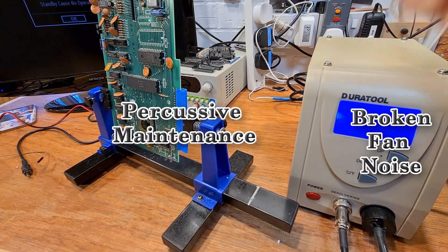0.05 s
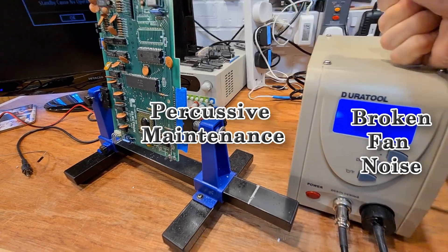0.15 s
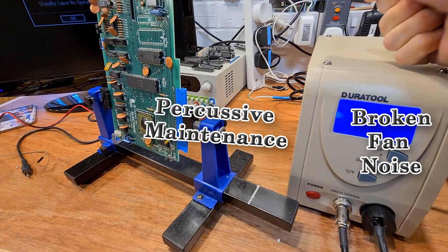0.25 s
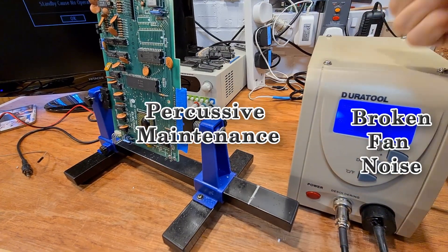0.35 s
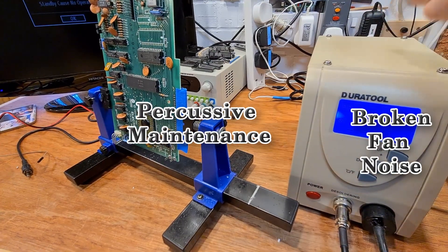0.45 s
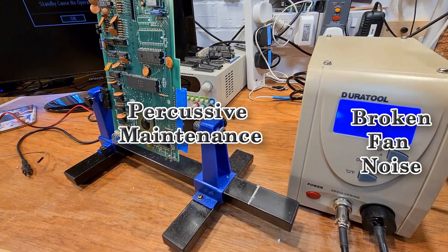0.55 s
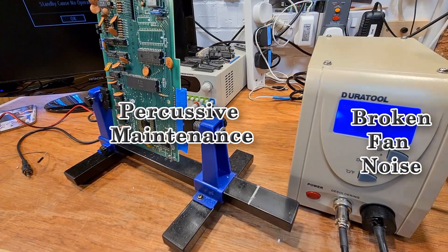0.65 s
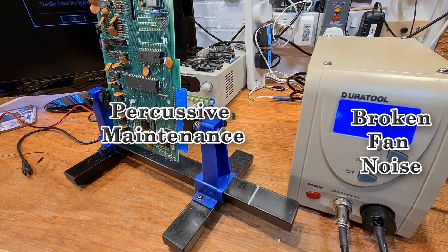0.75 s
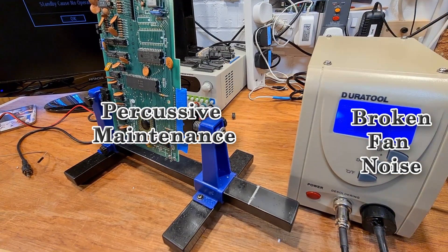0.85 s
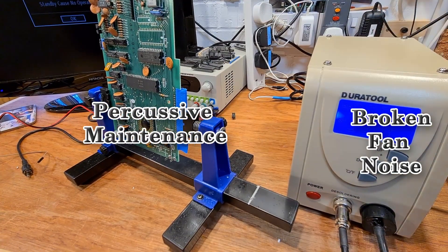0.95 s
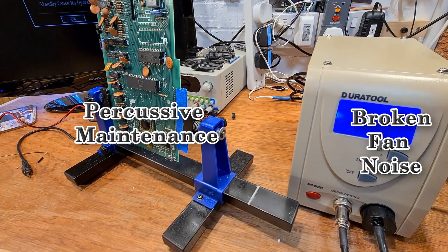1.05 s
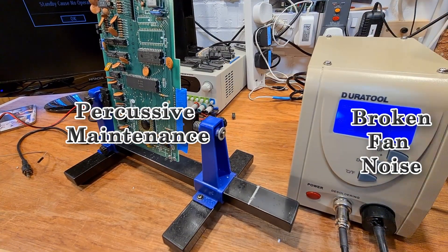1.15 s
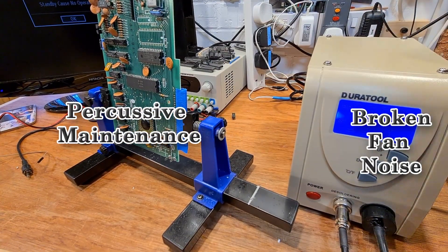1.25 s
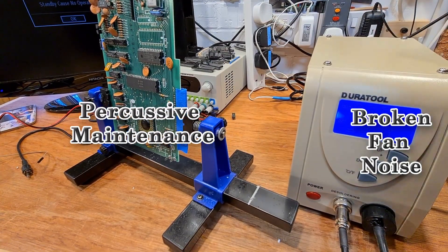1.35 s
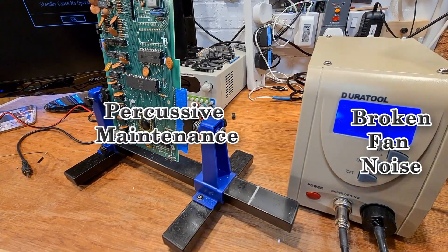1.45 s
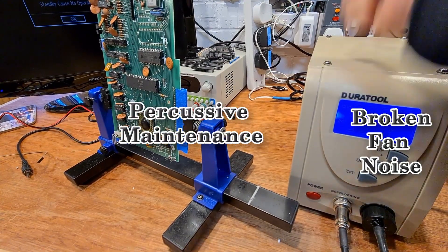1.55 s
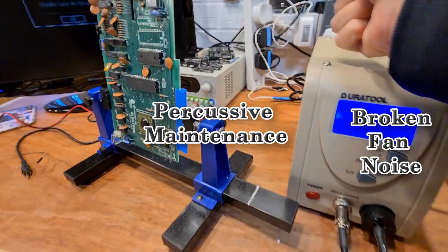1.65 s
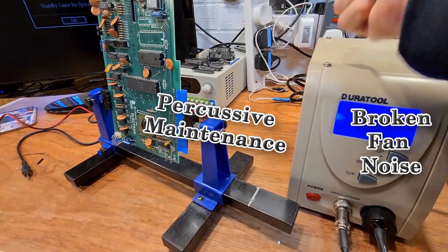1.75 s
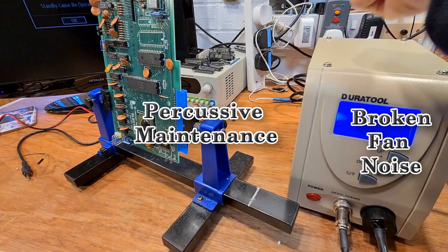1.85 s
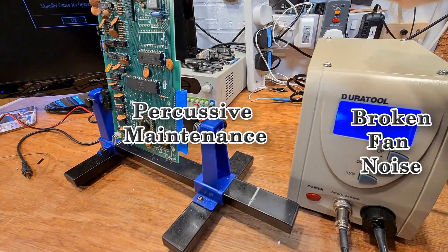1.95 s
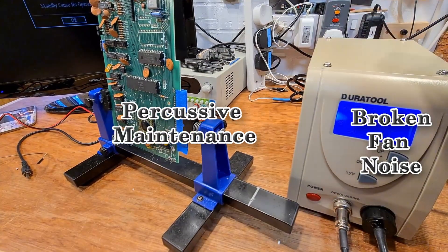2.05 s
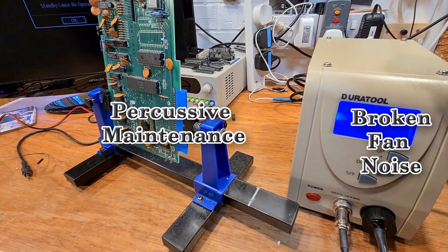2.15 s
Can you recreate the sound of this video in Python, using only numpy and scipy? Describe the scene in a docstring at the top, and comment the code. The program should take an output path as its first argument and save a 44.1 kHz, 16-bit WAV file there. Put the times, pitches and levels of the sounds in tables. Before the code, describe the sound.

A small worn fan buzzes and whines steadily while a fist thumps its metal case twice

```python
"""A small fast fan hums at the speed of its shaft, with a gritty whine and hiss from a worn bearing above it.
It runs inside a sheet-metal case on a workbench. A fist thumps the lid twice: the case booms and rattles,
and the fan slows, then picks up again. Sine waves make the hum and whine, and random clicks make the hiss.
Fading sine waves make the booms, short bursts of noise the rattles, and low noise the rumble of the room."""
import sys
import numpy as np
from scipy import signal
from scipy.fft import rfft, irfft, next_fast_len
from scipy.io import wavfile

SR = 44100
rng = np.random.default_rng(int(sys.argv[2]) if len(sys.argv) > 2 else 0)


def wrap_up_sound(samples):
    """Save the sound to the file named by the first command line argument, as 16-bit audio."""
    columns = np.atleast_2d(samples).T
    # keep every value between -1 and 1, then stretch to whole-number steps
    tamed = np.clip(columns, -1, 1)
    steps = np.round(tamed * 32767).astype(np.int16)
    wavfile.write(sys.argv[1], SR, steps)


def invert_db(x):
    """Field ratio 10**(x/20) for x, a level in decibels (scalar or array-like)."""
    u = np.asarray(x, float) / 20
    return 10 ** u


N = 97020  # length in samples

# Low rumble of room and bench, tone colour: pitch_hz, level_db (relative, per Hz)
RUMBLE_COLOUR = [(15, -73), (25, -22), (59, 2.5), (82, 9), (114, -18), (140, -2.5), (170, -1.5), (220, -53),
                 (370, -120)]
RUMBLE_DB = -56.5
# Low hum of the bench, fading away and swelling again after the second thump: start_s, level_db
BENCH_HUM_LEVEL = [(0, -38), (1.85, -89), (1.95, -44), (2.2, -36.5)]
BENCH_HUM_HZ = 60.7

# Room echo of the blows
ROOM_T60_S, ROOM_DB, ROOM_CUT_HZ = 0.14, -10, 7500

# Dense small chatter after each thump: start_s, level_db, t60_s (time to fade by 60 dB)
CLATTER = [(0.201, -15, 0.23), (1.692, -18, 0.22)]
# Tone colour of the chatter: pitch_hz, level_db (relative, per Hz)
CLATTER_COLOUR = [(180, -44), (300, -6.5), (520, -7), (998, -18), (1100, -11), (1490, -13), (1820, -10.5),
                  (7030, -35.5), (16200, -39)]
CLATTER_RISE_S, CLATTER_PER_S, CLATTER_SPREAD_DB = 0.011, 3000, 2.5
# Loose panels and screws that chatter: start_s, level_db, pitch_hz (centre)
RATTLES = [(0.2031, -22, 2430), (.2150, -20.5, 3860), (0.234, -23.5, 5400), (0.241, -35, 4600),
           (0.246, -33, 4850), (.2550, -26, 2370), (0.263, -39, 4000), (0.276, -30, 6000),
           (1.6970, -20.5, 2700), (1.6990, -21, 11800), (1.705, -31.5, 7060), (1.72, -27, 6260),
           (1.728, -34, 6850), (1.7370, -20.5, 5700), (1.7526, -21.5, 4440), (1.7565, -30, 10600),
           (1.7676, -28, 5840)]
RATTLE_T60_S, RATTLE_RISE_S, CRACK_DB = 0.02, 0.0012, 0.5

# Soft blows of the fist and rebounds of the lid: start_s, level_db, cut_hz (softer contact, lower cut)
THUMPS = [(0.1996, -31, 302), (0.2047, -12.5, 450), (.2140, -13, 1270), (0.2192, -14, 1510),
          (0.231, -28, 490), (0.2504, -19.5, 497), (.2700, -31, 400), (1.6890, -19.5, 303),
          (1.6935, -14, 494), (1.7025, -14, 690), (1.723, -16, 497), (1.7530, -21, 676),
          (1.787, -37.5, 298), (1.858, -30, 120)]
# What case and bench ring with: pitch_hz, level_db (added to the blow), t60_s
CASE = [(44.3, -6, 0.58), (68, -3.5, 0.35), (104.4, -4.5, 0.1), (188.8, -7, 0.32), (229.3, -3.5, 0.13),
        (260.8, -2, 0.1), (313.2, -0.5, 0.16), (384.5, -7, 0.13), (538.5, -7, 0.061), (745, -8, 0.15),
        (932, -18.5, 0.19), (1095, 6, 0.035), (1266.5, -1.5, 0.12), (2063, -5, 0.19)]
STRENGTH_SPREAD_DB = 1.2
THUMP_APART = 0.49  # how much the strengths differ between pick-up points
# Balance of the blows: pitch_hz, left_minus_right_db
BLOW_PAN = [(60, -1), (200, 0), (500, -1.5), (1100, -0.5), (2500, 3), (5000, 16), (12000, 7.5)]
# Left-right likeness of the blows: pitch_hz, likeness (0 to 1)
BLOW_LIKENESS = [(100, 0.73), (500, 0.97), (1100, 0.56), (3000, 0.4), (12000, 1)]

# Bearing grit and air, tone colour: pitch_hz, level_db (relative, per Hz)
HISS_COLOUR = [(180, -16), (300, -6.5), (367, -28.5), (547, -14), (657, -30.5), (727, -13), (949, -32),
               (1030, -22), (1180, -21.5), (1240, -23.5), (1390, -21.5), (1510, -13.5), (1950, -8),
               (2580, -15), (3160, -5.5), (3430, -12), (4710, -3), (6050, -14), (7520, -11.5),
               (8170, -23.5), (12400, -11.5), (15200, -11), (16200, -30.5)]
# Level of the hiss before its boost, in three stretches: start_s, level_db
HISS_LEVEL = [
    [(0.0, -48), (0.13, -48), (0.132, -47.5), (0.17, -48.5)],
    [(0.33, -46), (0.84, -46), (1.014, -48), (1.66, -47.5)],
    [(1.83, -49.5), (1.98, -44.5), (2.028, -46.5), (2.2, -47.5)],
]
HISS_BOOST_DB, GRIT_PER_S, GRIT_SPREAD_DB = 7.5, 15000, 1.5
# Swells of the grit within each shaft turn: multiple (swells per turn), depth, phase_rad
TURN_PULSE = [(1, 0.22, 0.66), (2, 0.18, 3.3), (3, 0.056, 6.6)]
# Left-right likeness of the hiss: pitch_hz, likeness (0 to 1)
HISS_LIKENESS = [(300, 0.84), (1400, 0.41), (3000, 0.46), (7000, 0.32), (15000, 0.13)]
# Balance of the fan: pitch_hz, left_minus_right_db
FAN_PAN = [(60, -1), (200, 2.5), (700, 1.8), (1300, -4), (2400, 3.5), (4400, 5), (8000, 0), (15000, 7.5)]

# Shaft speed, knocked down by each thump and creeping back: start_s, turns_hz
SPEED = [(0, 212), (.2, 213), (.26, 193.5), (.34, 198.3), (.42, 201.4), (.59, 205.9), (.7, 207.6),
         (.84, 209.4), (.98, 210.3), (1.12, 211.3), (1.26, 212.2), (1.4, 212.7), (1.69, 213.8), (1.77, 192),
         (1.89, 197.1), (1.96, 199.7), (2.05, 202.5), (2.2, 205.3)]
FULL_SPEED_HZ = 213
# Level of the hum, in three stretches: start_s, level_db
HUM_LEVEL = [
    [(0.0, -35), (0.01, -30), (0.024, -30.5), (0.118, -30), (0.162, -30.5), (0.17, -32)],
    [(0.33, -35), (0.374, -29.5), (0.484, -33), (0.562, -31), (1.652, -31), (1.66, -32.5)],
    [(1.83, -36), (1.86, -27), (1.9, -28.5), (2.05, -32), (2.184, -31.5), (2.2, -29.5)],
]
SKIRT_DB, SKIRT_HZ = -23.5, 43  # noisy edge around the hum
OCTAVE_DB, OCTAVE_DB_PER_HZ = -69, 0.86  # the hum's octave grows as the fan slows
# Second rate in the bearing, not a multiple of the shaft speed, which also sags after each thump;
# the shaft turn chops it into side tones: start_s, pitch_hz
WHINE = [(0, 1351), (.19, 1347), (.3, 1322), (.4, 1341), (.52, 1363), (.66, 1375), (.8, 1371), (1.0, 1361),
         (1.3, 1349), (1.66, 1337), (1.84, 1308), (1.93, 1343), (2.07, 1364), (2.2, 1368)]
# Overtones of the shaft turn, one row per multiple: level_db (at full speed)
SHAFT_TONES = [-76, -72.5, -62.5, -55, -51.5, -69, -53, -67, -76, -62.5, -53.5, -57, -65, -61, -53, -67,
               -61, -49, -51, -55, -45, -69, -64, -63]
# Tones at the whine plus shaft multiples, one row per multiple: level_db (at full speed)
WHINE_TONES = [-61.5, -73, -69, -89, -81, -72, -54.5, -77, -53, -57.5, -54, -74, -50, -56, -53, -58, -59.5,
               -53.5, -54.5, -52.5, -50.5, -48.5, -52.5, -60, -70, -70]
# Tones at twice the whine plus shaft multiples, one row per multiple: level_db (at full speed)
DOUBLE_TONES = [-53, -69, -68, -73, -52, -82, -71, -82, -55, -83, -65, -50, -73, -48, -49, -65, -89, -56,
                -47]
# First shaft multiple in each of these three tone families: multiple
FIRST_MULTIPLE = [3, -5, -5]
# Level change of each family as the fan slows: change_db (per Hz of lost speed)
SLOW_GAIN = [-0.74, 0.03, -0.15]
TONE_WAVER_DB, TONE_SCATTER_RAD, TONE_SIDE_RAD = 2.6, 0.65, 0.7

LEFT_LAG_S = 0.00027  # the shared sound reaches the left microphone later
MIC_LOW_CUT_HZ = 39


def rms_one(x):
    """Scale a sound to an average strength (rms) of 1."""
    return x / np.sqrt(np.mean(x ** 2) + 1e-20)


def in_time(rows):
    """Turn the columns of a table into curves over all samples."""
    s, *columns = np.transpose(rows)
    return [np.interp(np.arange(N) / SR, s, column) for column in columns]


def at_hz(points, hz):
    """Read a table between its rows, on a log-frequency axis."""
    table_hz, values = np.array(points).T
    return np.interp(np.log(hz), np.log(table_hz), values)


def spectrum_grid():
    """Transform size with spare room at the end, and its frequencies (1 Hz up, to avoid log of zero)."""
    size = next_fast_len(N + 4096)
    return size, np.arange(size // 2 + 1) * SR / size + 1


def colour(x, spectrum):
    """Make each frequency louder or softer, following a table in dB."""
    size, hz = spectrum_grid()
    return irfft(rfft(x, size) * invert_db(at_hz(spectrum, hz)), size)[..., :N]


def drift(rate):
    """Slow random wander of spread 1: noise smoothed twice, made at every 40th sample and joined up."""
    r = np.exp(-80 * np.pi * rate / SR)
    noise = rng.standard_normal(N // 40 + 2002)
    slow = signal.lfilter([1], [1, -2 * r, r * r], noise)[2000:]
    return np.interp(np.arange(N) / 40, np.arange(len(slow)), rms_one(slow))


def grains(per_s, spread_db):
    """Three unrelated trains of random clicks of uneven size."""
    extra_db = spread_db * np.minimum(rng.exponential(1, (3, N)), 5)
    size = invert_db(extra_db) * rng.standard_normal((3, N))
    happens = rng.random((3, N)) < per_s / SR
    return rms_one(size * happens)


def place(centre, apart, likeness, pan):
    """Two microphones: the shared part reaches the left one later, the rest differs per side."""
    size, hz = spectrum_grid()
    alike = np.clip(at_hz(likeness, hz), 0, 1)
    half_pan_db = at_hz(pan, hz) / 2
    lag = [np.exp(-2j * np.pi * hz * LEFT_LAG_S), 1 + 0 * hz]
    shared = np.sqrt(alike) * rfft(centre, size) * lag
    separate = np.sqrt(1 - alike) * rfft(apart, size)
    balance = invert_db(np.array([half_pan_db, -half_pan_db]))
    return irfft((shared + separate) * balance, size)[:, :N]


def rumble():
    """Low floor of room and bench: coloured noise with a lumpy level, partly different per side."""
    noise = rms_one(colour(rng.standard_normal((3, N)), RUMBLE_COLOUR))
    noise = noise * invert_db(RUMBLE_DB + 7.5 * drift(3.1))
    return noise[0] + 0.47 * noise[1:]


def bench_hum():
    """Low hum of the bench: one sine wave that fades away, then swells again after the second thump."""
    level = invert_db(in_time(BENCH_HUM_LEVEL)[0] + 1.4 * drift(29.0))
    return level * np.sin(2 * np.pi * BENCH_HUM_HZ * np.arange(N) / SR)


def room(x):
    """Echo of the room: each side is smeared by its own dull, dying noise tail."""
    t = np.arange(SR // 2) / SR
    tail = rng.standard_normal((2, len(t))) * invert_db(-60 * t / ROOM_T60_S) * (t > 0.006)
    tail = tail / np.sqrt(np.sum(tail ** 2, axis=1, keepdims=True))
    dull = signal.butter(1, ROOM_CUT_HZ, fs=SR, output="sos")
    return signal.fftconvolve(x, signal.sosfilt(dull, tail), axes=1)[:, :N]


def clatter():
    """A spray of small clicks that swells quickly after each thump and dies away."""
    level = np.zeros(N)
    for s, db, t60 in CLATTER:
        since = np.maximum(np.arange(N) / SR - s, 0)
        level += invert_db(db - 60 * since / t60) * (1 - np.exp(-since / CLATTER_RISE_S))
    return level * rms_one(colour(grains(CLATTER_PER_S, CLATTER_SPREAD_DB), CLATTER_COLOUR))


def rattles():
    """Loose parts tick: each is a short noise burst with a pitched core and a broad crack."""
    out, size = np.zeros((3, N)), SR // 20
    t = np.arange(size) / SR
    fade = invert_db(-60 * t / RATTLE_T60_S) * (1 - np.exp(-t / RATTLE_RISE_S))
    no_bass = signal.butter(2, 1200.0, "high", fs=SR, output="sos")
    for s, db, hz in RATTLES:
        white = rng.standard_normal((3, size))
        band = signal.butter(2, [hz / 1.11, min(hz * 1.25, 19000)], "band", fs=SR, output="sos")
        core = rms_one(signal.sosfilt(band, white))
        crack = invert_db(CRACK_DB) * signal.sosfilt(no_bass, white)
        start = int(s * SR)
        out[:, start:start + size] += invert_db(db) * fade * (core + crack)
    return out


def thumps():
    """Soft contacts strike every ringing tone of the case, each with its own strength; three pick-up points."""
    out = np.zeros((3, N))
    t = np.arange(SR // 2) / SR
    for s, db, cut_hz in THUMPS:
        rings = np.zeros((3, len(t)))
        for hz, level_db, t60 in CASE:
            luck = rng.standard_normal(3)
            strength = np.array([invert_db(STRENGTH_SPREAD_DB * luck[0]), THUMP_APART * luck[1], THUMP_APART * luck[2]])
            ring = invert_db(db + level_db - 60 * t / t60) * np.sin(2 * np.pi * hz * t)
            rings -= strength[:, None] * ring
        soft = signal.butter(2, cut_hz, fs=SR, output="sos")
        start = int(s * SR)
        out[:, start:start + len(t)] += signal.sosfilt(soft, rings)[:, :N - start]
    return out


def grit(turn):
    """Worn bearing and air: a dense hiss of clicks that swells in step with the shaft turn."""
    swell = 1 + sum(depth * np.cos(multiple * turn + rad) for multiple, depth, rad in TURN_PULSE)
    noise = rms_one(colour(grains(GRIT_PER_S, GRIT_SPREAD_DB) * swell, HISS_COLOUR))
    level = invert_db(in_time(np.concatenate(HISS_LEVEL))[0] + HISS_BOOST_DB)
    return level * place(noise[0], noise[1:], HISS_LIKENESS, FAN_PAN)


def fan_hum(turn, lost_hz):
    """A sine at shaft speed with a noisy edge, plus its octave, which grows as the fan slows."""
    skirt = invert_db(SKIRT_DB) * (drift(SKIRT_HZ) + 1j * drift(SKIRT_HZ))
    level = np.sqrt(2) * invert_db(in_time(np.concatenate(HUM_LEVEL))[0])
    hum = level * np.real((1 + skirt) * np.exp(1j * turn))
    octave_level = invert_db(OCTAVE_DB + OCTAVE_DB_PER_HZ * lost_hz + 6.8 * drift(3.0))
    return hum + octave_level * np.sin(2 * turn)


def fan_tones(turn, lost_hz):
    """Hum, overtones and whine side tones; all but the hum waver and reach each side with their own phase."""
    whine = 2 * np.pi * np.cumsum(in_time(WHINE)[0]) / SR
    hum = fan_hum(turn, lost_hz)
    out = np.array([hum, hum])
    # m counts the whine: none, once, twice
    for m, levels in enumerate([SHAFT_TONES, WHINE_TONES, DOUBLE_TONES]):
        for k, db in enumerate(levels):
            start = TONE_SCATTER_RAD * rng.standard_normal()
            side = TONE_SIDE_RAD * rng.standard_normal()
            size = invert_db(db + SLOW_GAIN[m] * lost_hz + TONE_WAVER_DB * drift(5.5))
            phase = m * whine + (k + FIRST_MULTIPLE[m]) * turn + start
            out += size * np.cos(phase + [[side], [0]])
    return place(out, 0 * out, [(1, 1), (SR, 1)], FAN_PAN)


def scene():
    """Floor, blows with echo, and the fan: hum, grit and side tones share one turn, the whine has its own rate."""
    blows = thumps() + rattles() + clatter()
    blows = place(blows[0], blows[1:], BLOW_LIKENESS, BLOW_PAN)
    speed_hz, = in_time(SPEED)
    turn = 2 * np.pi * np.cumsum(speed_hz) / SR  # shaft angle in radians
    fan = grit(turn) + fan_tones(turn, FULL_SPEED_HZ - speed_hz)
    return rumble() + bench_hum() + blows + invert_db(ROOM_DB) * room(blows) + fan


def low_pass(x):
    """Removes everything above the highest recorded frequency."""
    return signal.sosfilt(signal.butter(12, 16530, fs=SR, output="sos"), x)


def record(dry):
    """The microphone loses the deepest bass, and peaks beyond full scale are clipped."""
    low_cut = signal.butter(4, MIC_LOW_CUT_HZ, "high", fs=SR, output="sos")
    mix = np.clip(signal.sosfilt(low_cut, dry), -1, 1)
    return low_pass(mix)


dry = scene()
out = record(dry)
wrap_up_sound(out)
```